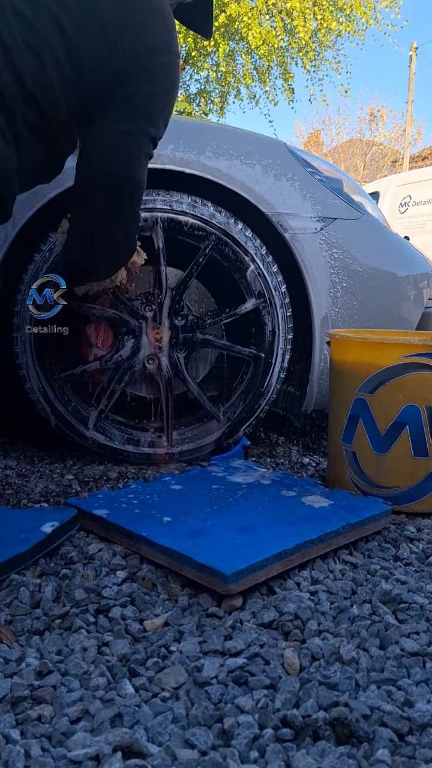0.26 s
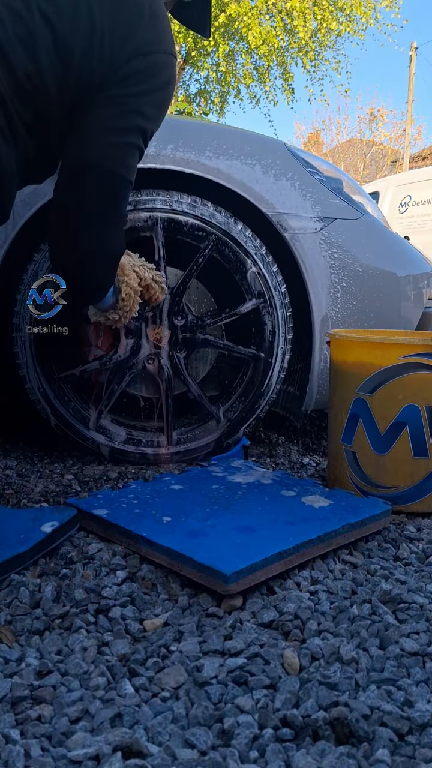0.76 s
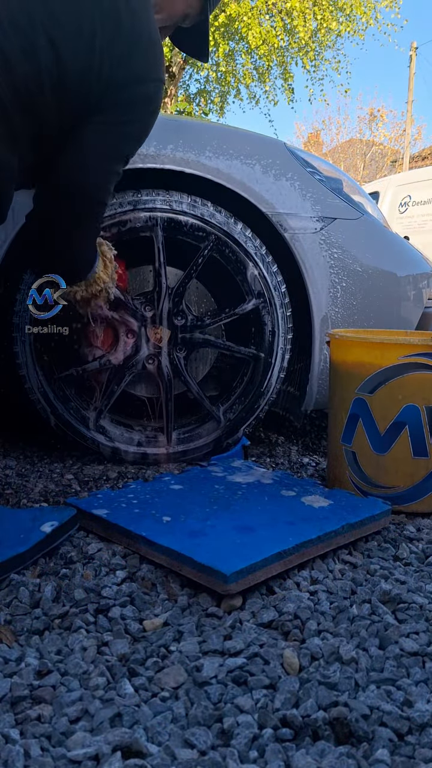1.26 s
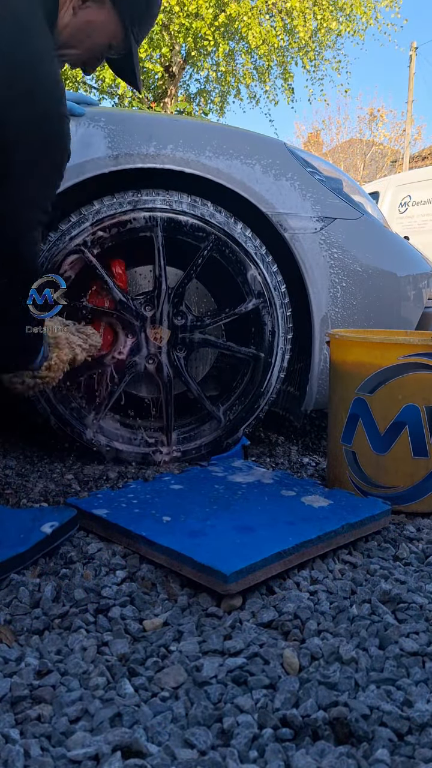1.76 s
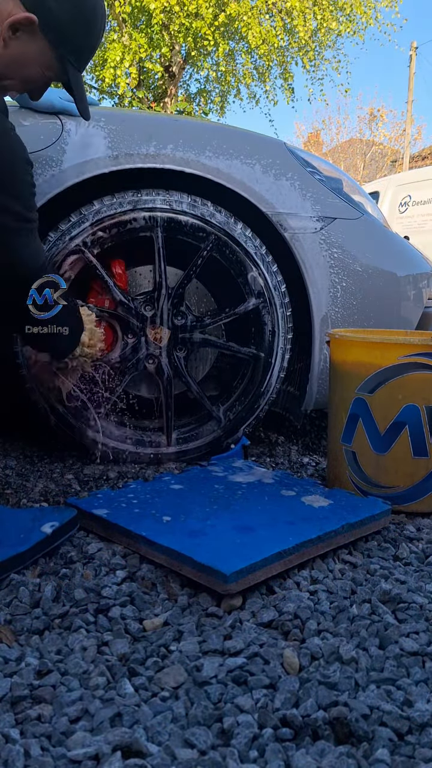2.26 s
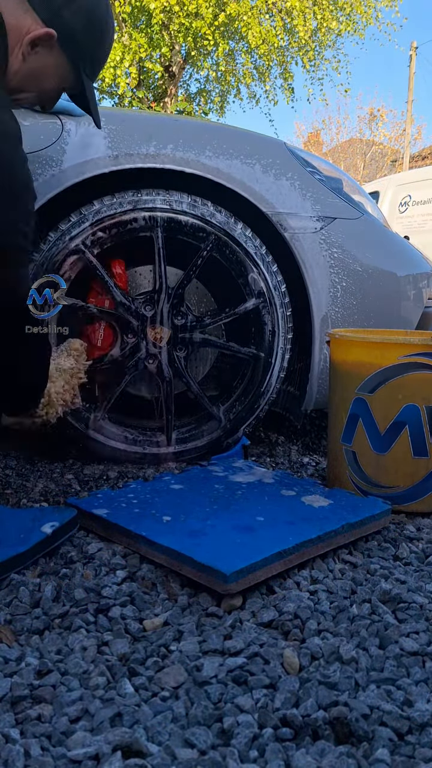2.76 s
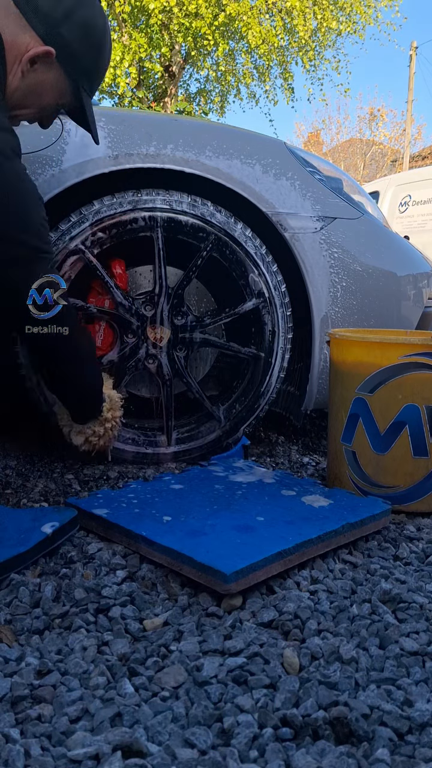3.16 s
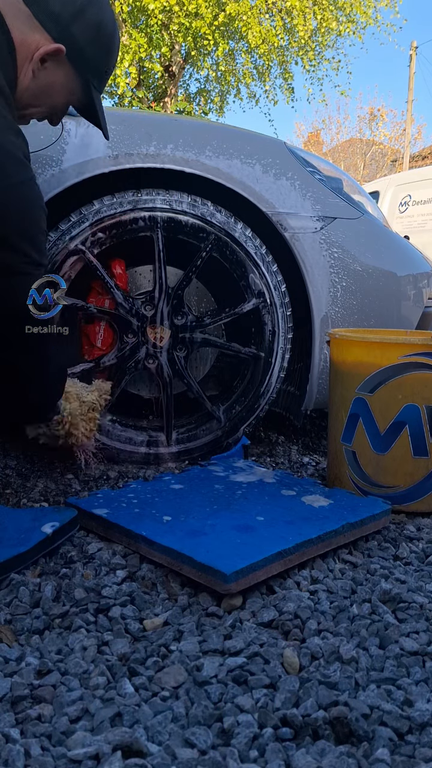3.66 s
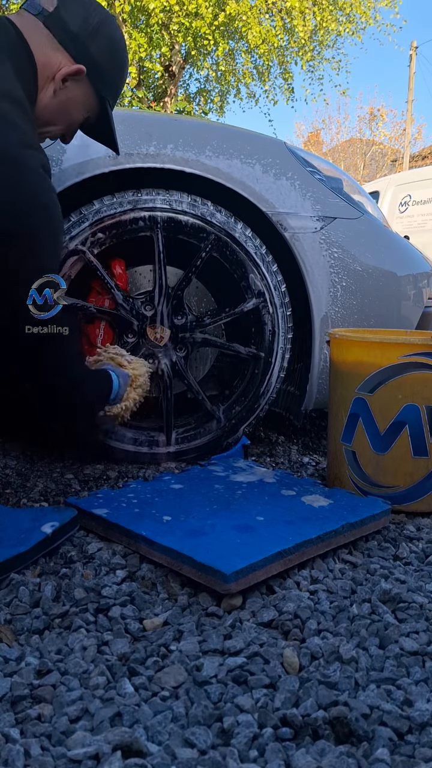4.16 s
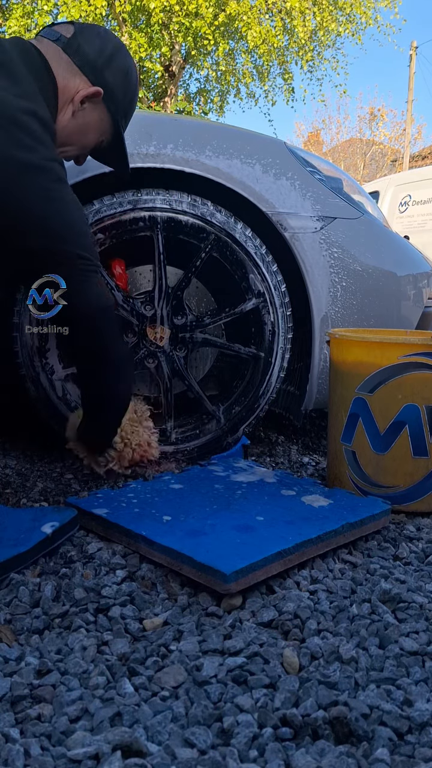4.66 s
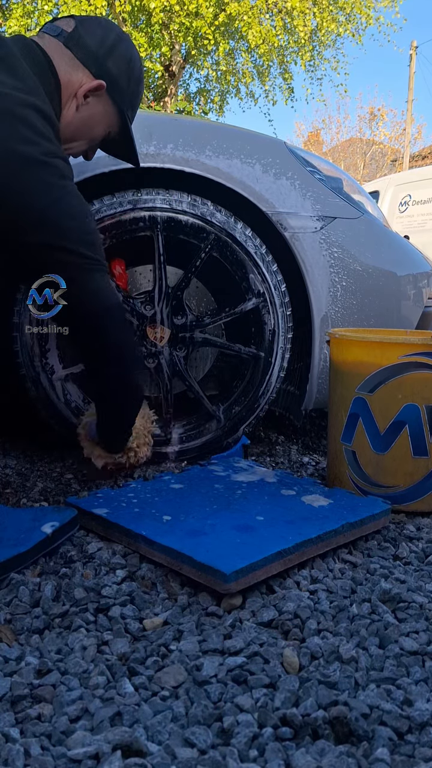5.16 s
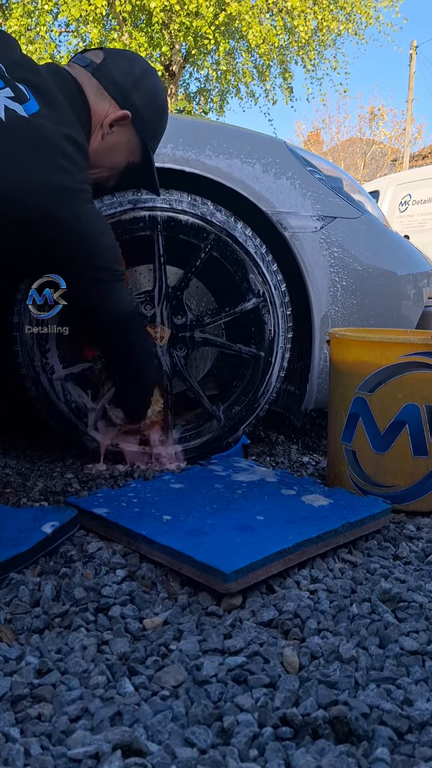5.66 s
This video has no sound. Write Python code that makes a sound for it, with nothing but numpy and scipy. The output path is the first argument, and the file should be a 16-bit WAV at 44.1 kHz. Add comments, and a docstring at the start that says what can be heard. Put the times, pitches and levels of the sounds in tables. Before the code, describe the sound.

A soapy wool mitt squelches and rubs over a wet car wheel outdoors, with tiny clicks, drips and a low distant engine hum.

```python
"""A soapy wool mitt scrubs the spokes of a car wheel on a gravel drive, over outdoor wash and a far engine.
First come light squelches (noise bubbles squeezed in each push), a spoke's decaying tones and a faint squeak.
After a second the pushes grow stronger, with fizzing noise, gliding drop plops, grit snaps and dull noise thuds.
Later come more drops, two heavier thuds, a second knock and a run of grit; the wheel well echoes the work.
The engine, two sine tones over rumble, booms at certain speeds and is at its slowest at the end."""
import sys
import numpy as np
from scipy import signal
from scipy.fft import rfft, irfft
from scipy.io import wavfile
from scipy.ndimage import uniform_filter1d

SR = 44100
rng = np.random.default_rng(int(sys.argv[2]) if len(sys.argv) > 2 else 0)


def unload_wav(signal):
    """Save mono or channel-first audio to the path in sys.argv[1] as 16-bit WAV at rate SR, clipped to [-1, 1]."""
    wavfile.write(
        sys.argv[1],
        SR,
        np.round(np.clip(np.atleast_2d(signal).T, -1, 1) * 32767).astype(np.int16),
    )


N = 260190
TIME = np.arange(N) / SR
FREQS = np.fft.rfftfreq(N, 1 / SR)

# Pushes that squeeze suds out of the wool. Each row: start in seconds, length in seconds before soft edges,
# relative strength in dB, foam spray in dB relative to that strength.
PUSHES = [(0.003, 0.027, -52, -10), (0.097, 0.016, -47.5, -17), (0.478, 0.081, -65.5, 0),
          (0.854, 0.057, -49, -10), (1.101, 0.028, -47, 2.5), (1.131, .014, -38.5, -1.5),
          (1.191, 0.0032, -34.5, -2.5), (1.308, 0.031, -55, 10.5), (1.348, 0.04, -61.5, 19),
          (1.471, 0.03, -34.5, -4.5), (1.52, 0.04, -44, -8), (1.623, 0.025, -41, -1),
          (1.834, 0.036, -58.5, -1), (2.01, 0.054, -53, -4.5), (2.149, 0.013, -51.5, -11),
          (2.188, 0.024, -53, -13), (2.421, 0.041, -48.5, -14), (2.713, 0.054, -50.5, -19.5),
          (3.055, 0.053, -57.5, -6.5), (3.12, 0.046, -52.5, -10), (3.17, 0.048, -51.5, -14),
          (3.324, .0065, -49, -7), (3.424, 0.013, -41.5, -16), (3.513, 0.05, -57, -4.5),
          (3.645, 0.0056, -45.5, -4.5), (3.718, .014, -52, -12), (3.812, 0.0086, -45, -9.5),
          (3.95, 0.0072, -49.5, -15), (4.42, 0.0043, -42, -6), (4.479, 0.026, -52, -10),
          (4.6, 0.041, -52, -7.5), (4.701, 0.02, -55, -5), (4.774, 0.05, -52, -3),
          (4.901, 0.026, -47, -0.5), (4.943, 0.023, -52.5, -10), (4.984, 0.041, -39, -15.5),
          (5.089, 0.0065, -47.5, -11.5), (5.113, 0.027, -45.5, -13.5), (5.258, 0.04, -60.5, 6.5)]
# How strong the mid-range squish is as the mitt moves round the wheel.
# Each row: time in seconds, change in dB.
SQUISH_CHANGE = [(0, 5), (1.1, -7.5), (1.65, -4.5), (2.4, 2.5), (3.2, 0.5), (3.6, 1), (4.45, 0), (4.65, 7),
                 (5.3, 4.5)]
SQUISH_FOAM_SHARE = 0.3  # how far the squish follows the foam setting, 0 to 1


def pushes():
    """Levels of slosh, squish and spray in each push, from its strength and its foam."""
    start_s, _, strength_db, foam_db = np.transpose(PUSHES)
    place_db = np.interp(start_s, *np.transpose(SQUISH_CHANGE))
    squish_db = strength_db + SQUISH_FOAM_SHARE * foam_db + place_db
    return strength_db, squish_db, strength_db + foam_db


def squeeze(level_db, edge_s, fall_s, tail_db):
    """Loudness curve of the pushes: each swells and eases, with a draining tail that peaks as it ends."""
    power = np.zeros(N)
    t = np.arange(SR // 2) / SR
    for (start_s, length_s, *_), db in zip(PUSHES, level_db):
        span = abs(length_s) + 2 * edge_s
        push = np.sin(np.pi * np.minimum(t / span, 1)) ** 2
        drain = (t > span / 2) * np.exp(-2 * abs(t - span) / fall_s)
        add(power, start_s - edge_s, amp(2 * db) * (push + amp(2 * tail_db) * drain))
    return np.sqrt(power)


# Resonances of the wheel and its well. Each row: centre in Hz, width in Hz, relative level in dB.
WHEEL_RESONANCES = [(530, 130, 4), (940, 130, 3), (1352, 140, 4), (1870, 150, 1), (2416, 130, 0),
                    (2785, 110, 1)]


def wheel_ring(ring_db):
    """Gain of the wheel's hollow resonances on top of the direct sound."""
    return 1 + amp(ring_db) * resonances(WHEEL_RESONANCES, FREQS)


# Tone of the wet suds. Each row: frequency in Hz, relative level in dB per Hz.
SUDS_TONE = [(150, 2), (330, -1), (560, 0), (740, -2), (950, -1.5), (1200, -6.5), (2000, -11), (3000, -14),
             (5000, -16.5)]
# Tone of the foam spray, also used by the crackle. Each row: frequency in Hz, relative level in dB per Hz.
FOAM_TONE = [(3000, -1.5), (4200, 2), (6000, 3.5), (7600, 8.5), (8800, -1), (11000, -5), (13500, -4),
             (16000, 3)]


def squelches():
    """Large air pockets slosh, small ones squish, and foam torn through the wool sprays."""
    slosh_db, squish_db, spray_db = pushes()
    hollow = amp(read(SUDS_TONE, FREQS)) * wheel_ring(ring_db=0.5)
    foam = amp(read(FOAM_TONE, FREQS))
    slosh = froth(per_s=600, spread_db=0, smooth=0.44, gain=hollow * band(91, 1144))
    squish = froth(per_s=800, spread_db=-2, smooth=1.0, gain=hollow * band(1344, 5120))
    all_spray = froth(per_s=510, spread_db=0.5, smooth=1.0, gain=foam * band(2860, 19200))
    # split the spray so that its top, the mist, has a level of its own
    mist = colour(all_spray, band(9370, 24000, order=10))
    spray = colour(all_spray, band(20, 8230, order=10))
    # airy foam tears into finer bubbles than wet foam
    mist_db = spray_db + 0.26 * np.clip(spray_db - squish_db, -8, 8)
    suds = slosh * squeeze(slosh_db - 1.04, edge_s=0.0015, fall_s=0.0074, tail_db=-2)
    suds += squish * squeeze(squish_db - 3.44, edge_s=0.0066, fall_s=0.019, tail_db=-10.0)
    suds += spray * squeeze(spray_db - 0.8, edge_s=0.006, fall_s=0.038, tail_db=-31.0)
    suds += mist * squeeze(mist_db + 2.5, edge_s=0.0044, fall_s=0.0093, tail_db=-27)
    return suds * amp(2.7 * wander(105))  # the wool catches and lets go


def crackle(level_db=-8):
    """Single larger bubbles burst sharply while the foam is squeezed."""
    _, _, spray_db = pushes()
    gain = amp(read(FOAM_TONE, FREQS)) * band(1200, 23000, order=2)
    pops = texture(bursts(per_s=250, spread_db=-0.3, smooth=0.02), gain)
    return pops * squeeze(spray_db + level_db, edge_s=0.0035, fall_s=0.022, tail_db=-10.5)


# The mitt sliding between pushes. Each row: time in seconds, relative level of the wet rub in dB.
SLIDE_LEVEL = [(0.0, -55.5), (0.85, -64), (1.31, -57), (1.84, -60.5), (2.09, -54.5), (2.22, -59.5),
               (3.11, -59.5), (3.27, -56), (3.63, -54), (4.11, -57), (4.26, -57.5), (4.99, -50.5),
               (5.19, -52), (5.9, -53)]
# Tone of the wet rub. Each row: frequency in Hz, relative level in dB per Hz.
RUB_TONE = [(80, -15.5), (200, 3), (330, -4.5), (520, -0.5), (760, -6), (980, -2.5), (1250, -11.5),
            (1800, -7.5), (2500, -25.5), (4000, -59), (8000, -35)]
# Foam fizzing on the wet wheel. Each row: time in seconds, relative level in dB.
FIZZ_LEVEL = [(0, -66.5), (0.5, -72.5), (0.7, -76), (1.02, -69), (1.3, -58), (1.85, -59.5), (2.4, -68),
              (2.6, -72.5), (2.8, -67.5), (3.3, -70.5), (3.97, -67), (4.22, -79), (4.34, -67.5), (4.9, -61),
              (5.18, -70), (5.3, -63.5), (5.9, -61.5)]
# Tone of the fizz. Each row: frequency in Hz, relative level in dB per Hz.
FIZZ_TONE = [(1200, -5.5), (2600, 1), (3500, -3.5), (5300, -3.5), (6200, -5), (7600, -1.5), (8600, -16),
             (12000, -12.5), (16000, -2)]
RUB_LEAD_S, RUB_FALL_S = 0.035, 0.042  # the mitt speeds up before a push and slows after it
FIZZ_FALL_S = 0.16  # how fresh foam dies down


def slide():
    """Wet wool sliding on lacquer, faster around each push, and the fizz of the foam that it leaves."""
    rub = texture(bursts(per_s=450, spread_db=3.5, smooth=1.0), amp(read(RUB_TONE, FREQS)))
    fizz = texture(bursts(per_s=1000, spread_db=4, smooth=6.4), amp(read(FIZZ_TONE, FREQS)))
    strength_db, _, spray_db = pushes()
    push_speed = squeeze(strength_db - 15.5, RUB_LEAD_S, RUB_FALL_S, tail_db=-23)
    speed = np.hypot(amp(curves(SLIDE_LEVEL)[0] - 3.0), push_speed)
    fresh_foam = squeeze(spray_db - 15, edge_s=0.037, fall_s=FIZZ_FALL_S, tail_db=-9.5)
    foam = np.hypot(amp(curves(FIZZ_LEVEL)[0] + 0.5), fresh_foam)
    return rub * speed * amp(1.8 * wander(35)) + fizz * foam * amp(1.4 * wander(31))


# Wet wool squeaking softly on lacquer.
# Each row: start in seconds, length in seconds, level in dB, pitch in Hz.
SQUEAK_EVENTS = [(0.463, 0.098, -71, 2920), (1.82, 0.04, -55.5, 2720), (4.28, 0.13, -70, 2754)]


def squeaks(half_width_hz=300):
    """Fibres stick and slip at a loose common rate: noise gathered around one pitch."""
    out = np.zeros((2, N))
    for start_s, length_s, db, hz in SQUEAK_EVENTS:
        swell = np.sin(np.pi * np.clip((TIME - start_s) / length_s, 0, 1))
        gain = 1 / (1 + ((FREQS - hz) / half_width_hz) ** 2)
        out += amp(db) * swell * texture(rng.standard_normal((2, N)), gain)
    return out


# The gloved hand bumping the rim through the mitt.
# Each row: start in seconds, relative level in dB, middle pitch of the thud in Hz.
BUMP_EVENTS = [(1.189, -28, 265), (1.478, -27, 380), (3.643, -22, 494), (4.417, -18.5, 564.5)]


def bumps(ring_s=0.0039, octaves=0.81):
    """A padded blow gives only a dull thud from the wheel, its pitch set by the place struck."""
    out, t = np.zeros((2, N)), np.arange(4000) / SR
    spread = 2 ** (octaves / 2)
    for start_s, db, hz in BUMP_EVENTS:
        push = np.zeros(N)
        add(push, start_s, amp(db - 8.0) * (1 - np.exp(-t / 0.0016)) * np.exp(-t / ring_s))
        gain = band(hz / spread, hz * spread, order=2)
        out += push * texture(pair(rng.standard_normal((2, N))), gain)
    return out


# Hard knocks on a spoke. Each row: start in seconds, relative level in dB.
KNOCK_EVENTS = [(0.1045, -33), (5.0927, -38)]
# Tones of a struck spoke. Each row: pitch in Hz, relative level in dB, time to fall by 60 dB in seconds.
SPOKE_TONES = [(2320, 8, 0.0051), (3110, -6, 0.012), (4890, -19, 0.033), (6890, -20, 0.034),
               (9050, -40, 0.028)]


def knocks():
    """A struck spoke rings briefly, damped by the wet wool."""
    out, t = np.zeros((2, N)), np.arange(3000) / SR
    for start_s, db in KNOCK_EVENTS:
        for side in range(2):
            ring = np.zeros(len(t))
            for hz, level_db, t60 in SPOKE_TONES:
                ring += amp(level_db - 60 * t / t60) * np.sin(2 * np.pi * (hz * t + rng.random()))
            add(out[side], start_s, amp(db + 2.5) * ring)
    return out


# Drops falling from the mitt. Each row: start in seconds, relative level in dB, starting pitch in Hz.
DROPS = [(0.434, -46, 540), (1.074, -37.5, 536.5), (1.589, -41, 520), (1.761, -40.5, 513),
         (1.933, -35.5, 577), (2.116, -34.5, 497), (3.327, -32.5, 1360), (3.392, -38.5, 784),
         (3.666, -35, 505), (5.434, -37.5, 466.5), (5.681, -60, 481.6)]


def plops(ring_s=0.003, glide=0.12, splash=0.48):
    """A drop traps a bubble that rings for a few cycles and rises in pitch."""
    out, t = np.zeros(N), np.arange(1500) / SR
    for start_s, db, hz in DROPS:
        bubble = np.sin(2 * np.pi * hz * t * (1 + glide * (1 - np.exp(-t / 0.024))))
        patter = unit(uniform_filter1d(rng.standard_normal(len(t)), size=16))
        envelope = (1 - np.exp(-t / 0.001)) * np.exp(-t / ring_s)
        add(out, start_s, amp(db) * (bubble + splash * patter) * envelope)
    return np.array([out, out])


# Grit ticking on the rim and underfoot.
# Each row: start in seconds, relative level in dB, balance of the top octave in dB before a shared lift.
GRIT_TICKS = [(0.1033, -53.5, -1.5), (0.35, -68, -7), (1.1124, -59, -14), (1.191, -35, -10),
              (1.2578, -40.5, -16), (1.295, -39, -28), (1.3582, -45, 0), (1.426, -50, -26),
              (1.6401, -48, -1), (1.839, -44.5, -17), (2.3697, -66.5, -3), (3.055, -52.5, -13),
              (4.5117, -57, -4), (5.1523, -50, -35), (5.1991, -38, -24), (5.2154, -35, -25),
              (5.232, -41, -28), (5.2589, -47, -20), (5.2838, -40, -14), (5.4667, -48.5, -41),
              (5.52, -51.5, -16), (5.5843, -46, -39)]
# Tone of the grit. Each row: frequency in Hz, relative level in dB per Hz.
GRIT_TONE = [(300, 16.5), (1500, 10), (3000, 11), (7600, 16.5), (8800, 4), (12000, 6.5), (16000, 15)]


def clicks(scatter=0.34, scatter_s=0.0039):
    """Grit snaps once; the ground and the spokes scatter the snap for a few milliseconds."""
    body, top = np.zeros((2, N)), np.zeros((2, N))
    t = np.arange(1500) / SR
    for start_s, db, top_db in GRIT_TICKS:
        for side in range(2):
            scattered = scatter * rng.standard_normal(len(t)) * np.exp(-t / scatter_s)
            snap = amp(db) * ((t == 0) + scattered)
            add(body[side], start_s, snap)
            add(top[side], start_s, snap * amp(top_db + 15.0))
    grit = amp(read(GRIT_TONE, FREQS))
    return colour(body, grit * band(196, 6530)) + colour(top, grit * band(7460, 24000))


def wheel_well(x, t60=0.2):
    """Short diffuse echo from the wheel well, the bodywork and the gravel: fading noise as echo taps."""
    t = np.arange(SR // 3) / SR
    taps = rng.standard_normal((2, len(t))) * amp(-60 * t / t60) * (t > 0.003)
    taps /= np.linalg.norm(taps, axis=1, keepdims=True)
    return pair(signal.fftconvolve(x, taps, axes=1)[:, :N])


# The steady wash of the yard and far roads. Each row: frequency in Hz, relative level in dB per Hz.
WASH_TONE = [(60, -13), (170, -7.5), (300, -1.5), (700, -3), (980, 2.5), (1300, 0.5), (1900, -11.5),
             (2600, -41), (4000, -60), (9000, -26.5)]


def yard(level_db=-65):
    """Open-air wash that swells a little."""
    wash = texture(pair(rng.standard_normal((2, N))), amp(read(WASH_TONE, FREQS)))
    return wash * amp(level_db + 1.4 * wander(3.7))


# The distant engine's speed. Each row: time in seconds, firing rate in Hz before small wavering.
ENGINE_SPEED = [(0, 66.6), (0.34, 71.67), (0.75, 67.5), (1.0, 66.74), (1.3, 62), (1.66, 62), (1.9, 67.07),
                (2.35, 74.73), (2.7, 67.5), (3.0, 54.77), (3.25, 53.72), (3.75, 57.74), (4.05, 60.72),
                (4.5, 52), (4.9, 51.3), (5.35, 49.3), (5.9, 40.6)]
# Drive for the engine's overtone and rumble. Each row: time in seconds, relative level in dB.
DRONE_LEVEL = [(0, -57), (0.75, -59), (1.4, -49), (1.95, -58), (2.25, -52.5), (2.8, -51.5), (3.75, -45.5),
               (4.1, -48), (4.9, -40.5), (5.2, -56), (5.55, -41.5), (5.9, -40)]
# Resonances that boom when the firing rate crosses them.
# Each row: centre in Hz, width in Hz, relative level in dB.
BOOM_RESONANCES = [(50.36, 1, 9), (52.1, 5.6, 6.5), (62, 5.5, 10)]
# Tone of the engine's rumble. Each row: frequency in Hz, relative level in dB per Hz.
RUMBLE_TONE = [(12, -4.5), (20, -16.5), (51, -2.5), (80, 4.5), (125, -2.5), (193, -11), (336, -20.5),
               (400, -20.5), (520, -53), (880, -120)]
FIRING_DB = -55.5  # the firing tone away from any boom, before it wavers


def engine(overtone_db=-3, rumble_db=-48, rumble_follows=0.21):
    """A far engine changing speed: only its two lowest orders and a soft rumble carry."""
    hz, drone_db = curves(ENGINE_SPEED)[0], curves(DRONE_LEVEL)[0]
    firing_db = FIRING_DB + 20 * np.log10(1 + resonances(BOOM_RESONANCES, hz))
    cycles = np.cumsum(hz * (1 + 0.015 * wander(11))) / SR
    drone = np.zeros(N)
    for order, db in enumerate([firing_db, drone_db + overtone_db], 1):
        tone = np.sqrt(2) * np.sin(2 * np.pi * (order * cycles + rng.random()))
        drone += amp(db + 2.5 * wander(12.3)) * tone
    rumble = texture(pair(rng.standard_normal((2, N))), amp(read(RUMBLE_TONE, FREQS)))
    return drone + rumble * amp(rumble_db + rumble_follows * (drone_db - drone_db.mean()))


def froth(per_s, spread_db, smooth, gain):
    """Coarse bubbles fed by an even flow: uneven from pop to pop, steady over a push."""
    sound = texture(bursts(per_s, spread_db, smooth), gain)
    return sound / np.sqrt(uniform_filter1d(sound.mean(0) ** 2, size=600) + 0.041)


def bursts(per_s, spread_db, smooth):
    """Tiny bubbles of random strength bursting over the smooth hiss of wool fibres."""
    size = amp(spread_db * np.minimum(rng.exponential(1, N), 4)) * (rng.random(N) < per_s / SR)
    pops = unit(size * rng.standard_normal((2, N)))
    return pair(pops + smooth * rng.standard_normal((2, N)))


def texture(drive, gain):
    """A coloured stereo texture whose centre, the mean of both sides, has unit level."""
    sound = colour(drive, gain)
    return sound / np.std(sound.mean(0))


# How alike the two sides are. Each row: frequency in Hz, left-right likeness from 0 to 1.
LIKENESS = [(60, 0.74), (130, 0.96), (250, 0.91), (550, 0.85), (1000, 0.17), (2000, 0.22), (4000, 0.061),
            (16000, 0.026)]


def pair(two):
    """Two unrelated signals become alike in the bass, as at two close ports."""
    a, b = rfft(two)
    turn = np.arccos(np.clip(read(LIKENESS, FREQS), 0, 1)) / 2
    left = a * np.cos(turn) + b * np.sin(turn)
    right = a * np.cos(turn) - b * np.sin(turn)
    return irfft(np.array([left, right]), N)


def colour(x, gain):
    """Causal filter with the given gain at each frequency, its phase derived from the log gain."""
    log_gain = np.log(np.maximum(gain, np.max(gain) * 1e-5))
    circle = np.concatenate([log_gain, log_gain[-2:0:-1]])
    response = np.exp(np.conj(signal.hilbert(circle)))[:len(FREQS)]
    return irfft(rfft(x) * response, N)


def band(lo_hz, hi_hz, order=6):
    """Gain of a band-pass."""
    low_cut = (lo_hz / (FREQS + 1)) ** (2 * order)
    high_cut = (FREQS / hi_hz) ** (2 * order)
    return 1 / np.sqrt((1 + low_cut) * (1 + high_cut))


def resonances(table, hz):
    """Summed gain of a table of resonances at the given frequencies."""
    return sum(amp(db) / (1 + ((hz - centre) / (width / 2)) ** 2) for centre, width, db in table)


def wander(rate_hz):
    """Slow random wavering of unit size, fading out around the given rate."""
    return unit(irfft(rfft(rng.standard_normal(N)) * np.exp(-(FREQS / rate_hz) ** 2), N))


def amp(db):
    """Decibels to gain."""
    return 10 ** (np.asarray(db) / 20)


def unit(x):
    """Scales to an rms of one."""
    return x / np.sqrt(np.mean(x ** 2) + 1e-20)


def read(points, hz):
    """Reads a spectrum table on a log-frequency axis."""
    f, value = np.transpose(points)
    return np.interp(np.log(hz + 1), np.log(f + 1), value)


def curves(rows):
    """Each column of a timed table, at every sample."""
    s, *columns = np.transpose(rows)
    return [np.interp(TIME, s, c) for c in columns]


def add(mix, s, sound):
    """Mixes a sound in at time s in seconds, cut off at the end of the mix."""
    part = mix[max(round(s * SR), 0):][:len(sound)]
    part += sound[:len(part)]


def scene():
    """The work at the wheel, its echo, the yard and the distant drone."""
    work = squelches() + crackle() + plops() + clicks() + knocks() + bumps()
    return work + amp(-9.0) * wheel_well(work) + slide() + squeaks() + yard() + engine()


# The right microphone port faces away and loses treble.
# Each row: frequency in Hz, right level minus left level in dB.
PORT_BALANCE = [(40, -3.5), (150, 0.1), (1000, 0.8), (2000, -0.5), (3500, -3.5), (5400, -6), (7400, -34),
                (8400, -16), (9600, -3.5), (11500, -14.5), (15000, -23)]
EDGE_HZ = 15950  # upper limit of the sound


def record(dry):
    """The two ports share the treble unevenly; then a low-pass sets the band limit."""
    right = amp(read(PORT_BALANCE, FREQS))
    # keep the summed power gain of the two ports the same at every frequency
    ports = np.array([np.ones_like(right), right]) * np.sqrt(2 / (1 + right ** 2))
    heard = irfft(rfft(dry) * ports, N)
    low_pass = signal.firwin(511, EDGE_HZ, window=("kaiser", 9), fs=SR)
    return signal.oaconvolve(heard, low_pass[None], "same")


dry = scene()
out = record(dry)
unload_wav(out)
```